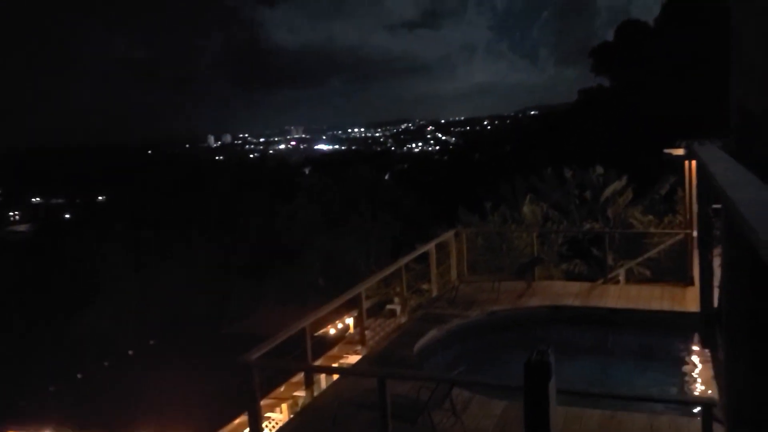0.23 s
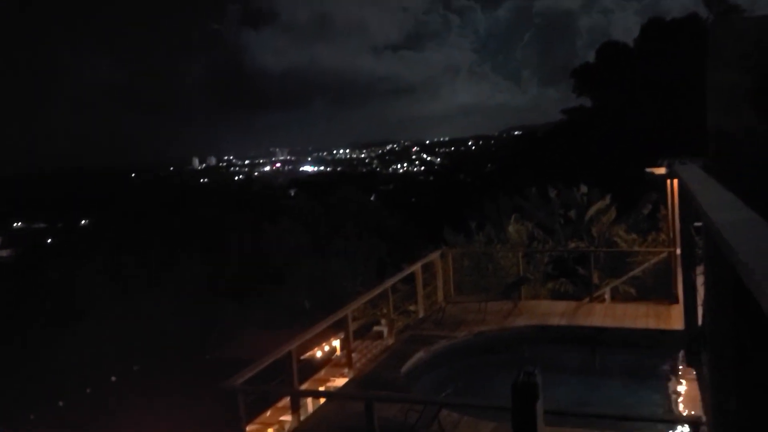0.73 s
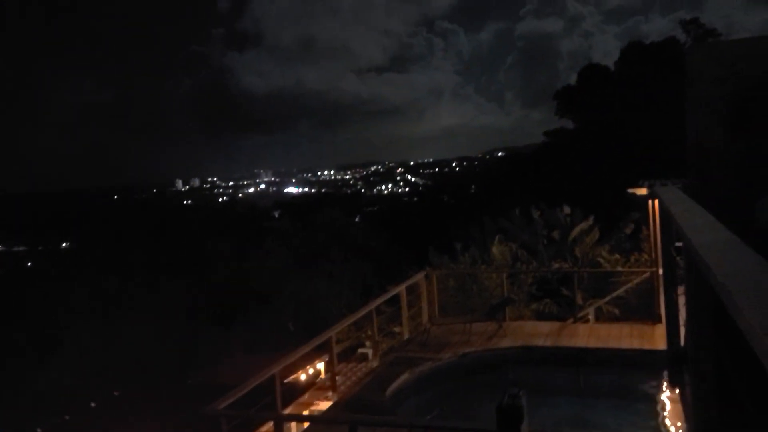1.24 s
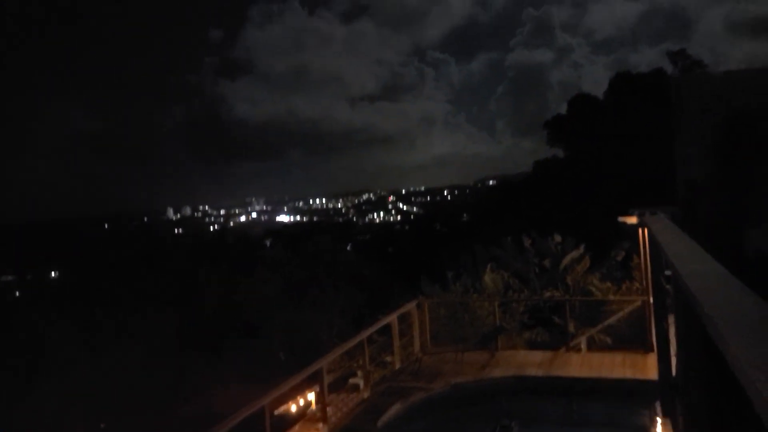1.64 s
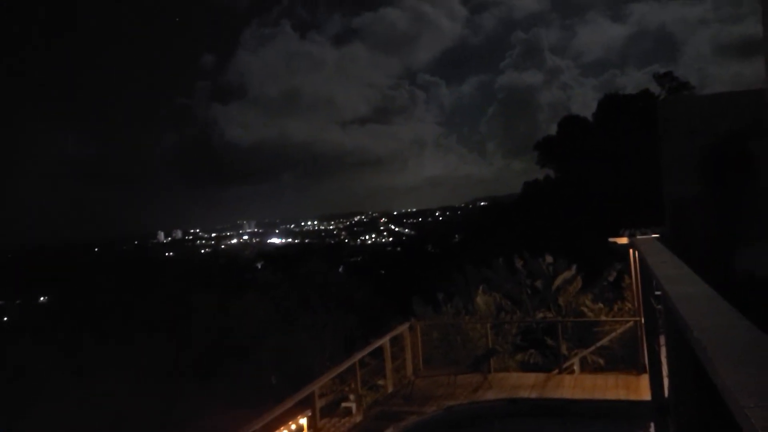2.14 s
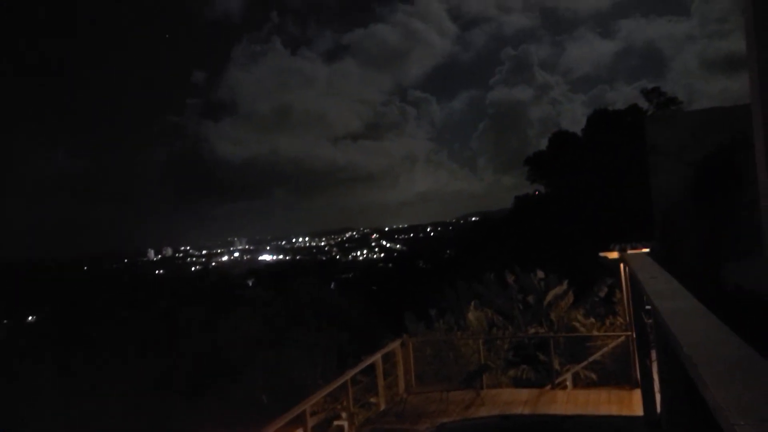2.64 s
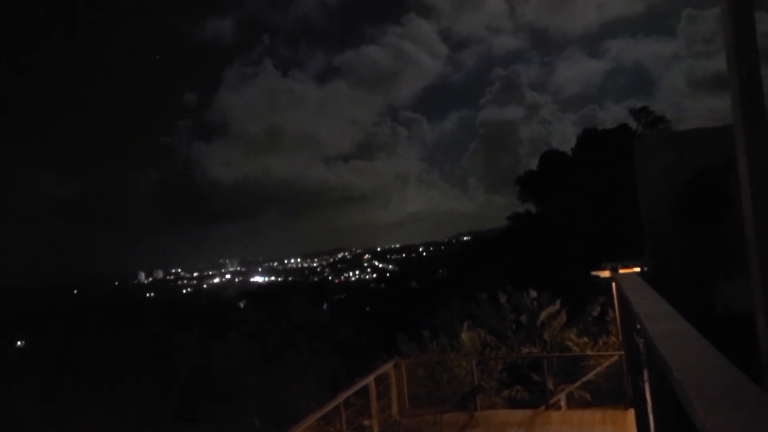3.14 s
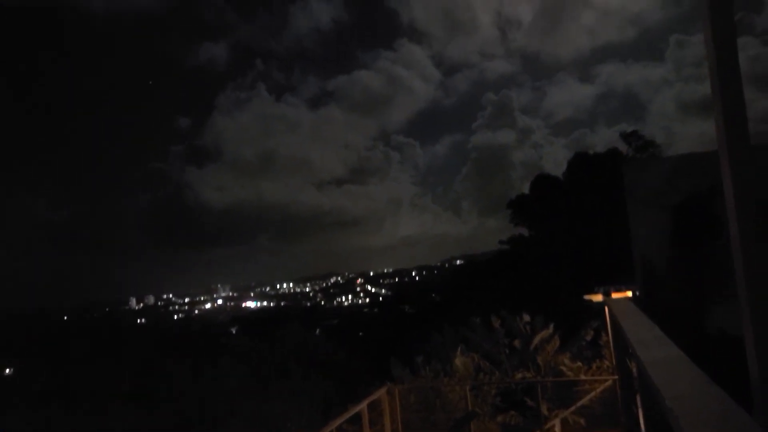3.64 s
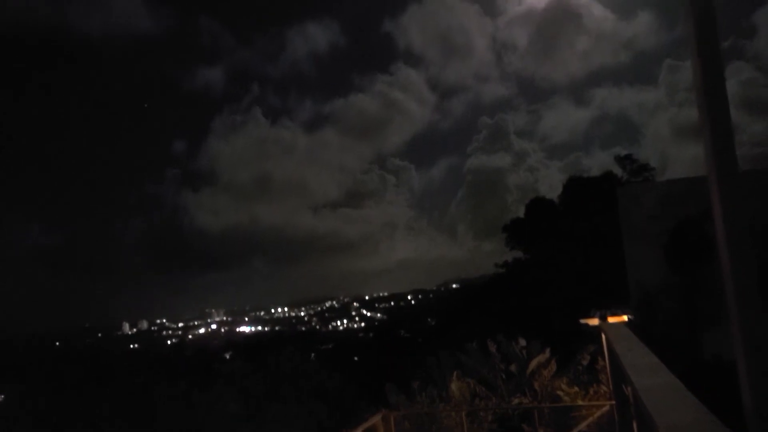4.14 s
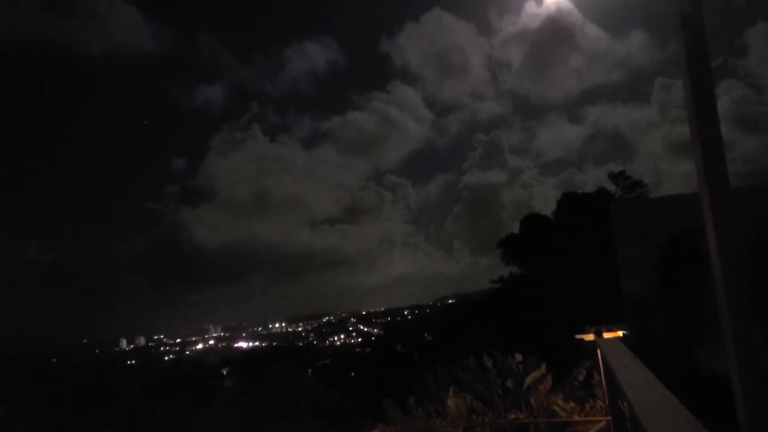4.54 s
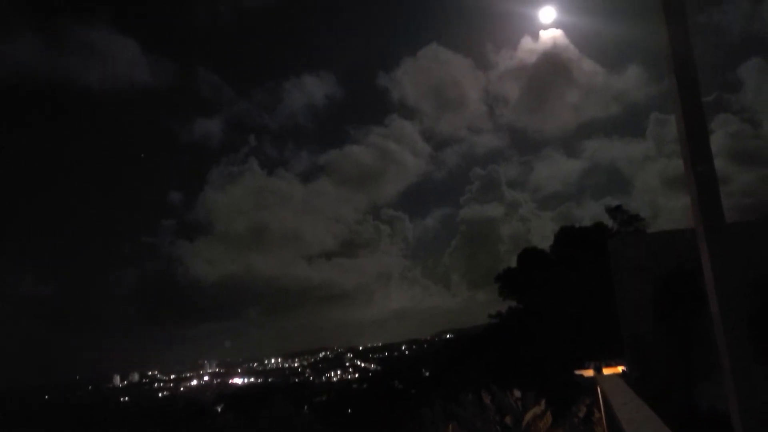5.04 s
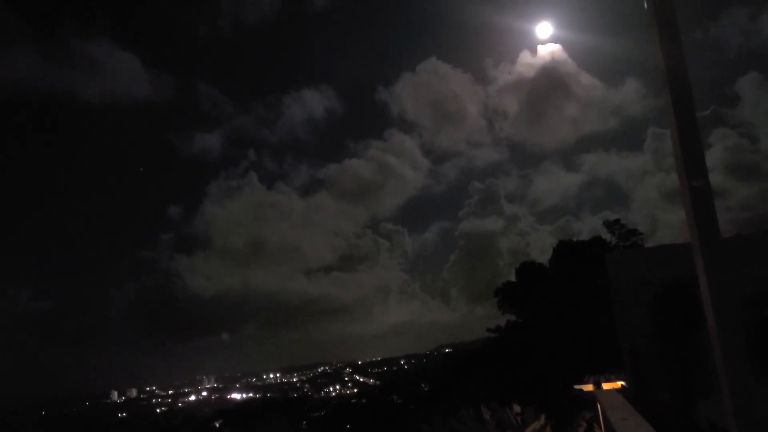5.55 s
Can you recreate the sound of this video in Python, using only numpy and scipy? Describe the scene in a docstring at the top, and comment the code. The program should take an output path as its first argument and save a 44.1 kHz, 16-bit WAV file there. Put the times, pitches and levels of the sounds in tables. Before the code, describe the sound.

Tree frogs whistle two-note calls over a shrill, steady insect chorus on a warm night terrace, with early wind thumps and a late distant engine.

```python
"""A warm night on a hillside terrace, heard through two microphone ports: far frogs call (echoes of gliding tones),
crickets and katydids shrill (coloured noise, pulsing in level), and the town below rumbles and hisses (noise).
Wind buffets both ports, mostly in the first two seconds (low noise shaped by gusts). From the start, tree frogs
whistle a falling low note and a rising high one, one frog near at 1.2, 3.1 and 5.1 s; high ticks and pips join in.
The low rumble sinks from 1 to 2.2 s, as if a wind filter cut the lows. After 3.2 s a far vehicle fades in
and speeds up, easing at the very end (sines at multiples of its firing rate)."""
import sys
import numpy as np
from scipy import signal
from scipy.fft import rfft, irfft, next_fast_len
from scipy.io import wavfile
from scipy.ndimage import uniform_filter1d, map_coordinates

SR = 44100
rng = np.random.default_rng(int(sys.argv[2]) if len(sys.argv) > 2 else 0)


def amplitude_ratio(level_db):
    """Convert a level in decibels to the matching linear amplitude (field) ratio."""
    exponent = np.asarray(level_db, float) / 20
    return 10 ** exponent


def to_wav(s):
    """Save 16-bit WAV."""
    ch = np.atleast_2d(s).T  # columns
    pcm = np.round(np.clip(ch, -1, 1) * 32767)  # PCM
    wavfile.write(sys.argv[1], SR, pcm.astype(np.int16))


N = 254898  # samples, 5.78 s

# shapes of the notes: length_s, glide (share of the starting pitch), rise_s, fade_db (change over the note)
LOW = (.092, -.062, .004, -5)
HIGH = (.118, .21, .015, -3)
PIP = (.026, -.04, .006, 0)
TICK = (.016, .015, .004, 0)
# far frogs by kind: shape, rate (notes a second), mean_start_pitch_hz, pitch_spread_hz, level_db
FAR_FROGS = [(HIGH, 45, 2670, 60, -42.5), (PIP, 80, 2000, 90, -46), (LOW, 5.5, 1680, 49, -57.5),
             (HIGH, 9, 2760, 60, -49)]
# colour of the crickets' trill: frequency_hz, density_db (per Hz)
CRICKET_COLOUR = [(3650, -120), (3900, -25.5), (4400, -29), (5000, -19), (5500, -22), (5850, -6),
                  (6100, 1.5), (6320, -7.5), (6480, -3), (6700, -14.5), (6950, -12), (7500, -26.5),
                  (7900, -19), (8250, -28.5), (8400, -120)]
# colour of the katydids' rasp: frequency_hz, density_db (per Hz)
KATYDID_COLOUR = [(7900, -120), (8200, -24), (8900, -18), (9500, -15), (10800, -2), (11600, 2.5),
                  (12050, 7), (12500, 3.5), (13000, 7), (13500, 3), (15700, 4), (15800, -120)]
# strength of the breeze at the ports: time_s, level_db
BREEZE_LEVEL = [(0.0, -42), (0.4, -42), (0.8, -40), (1.1, -38), (1.54, -40), (2.05, -40), (2.25, -52),
                (2.55, -43), (2.85, -47.5), (3.1, -50.5), (4.1, -49), (4.4, -39), (4.6, -60), (5.78, -44)]
# strong single buffets: peak_s, left_db, right_db, width_s (between points 8 dB down)
GUSTS = [(0.045, -28.5, -46, 0.016), (0.083, -23, -47, 0.016), (0.177, -21, -20.5, 0.056),
         (0.259, -51, -30.5, 0.041), (0.539, -50, -27, 0.013), (0.583, -28, -49, 0.012),
         (0.731, -33, -23.5, 0.093), (0.795, -26.5, -22, 0.039), (0.899, -24, -21.5, 0.086),
         (1.162, -37, -25, 0.012), (1.267, -40, -32.9, 0.026), (1.455, -26, -25, 0.014),
         (1.498, -29, -24, 0.037), (1.593, -27, -27, 0.071), (1.652, -26, -24.5, 0.015),
         (1.785, -35, -32, 0.035), (1.937, -37, -33, 0.027), (1.986, -26.5, -34, 0.055),
         (2.93, -33, -34, 0.036)]
# colour of the wind at a port: frequency_hz, density_db (per Hz)
WIND_COLOUR = [(13, -34), (22, -19), (53, 1), (81, 4.5), (155, -20.5), (210, -19.5), (265, -35), (400, -33),
               (520, -44), (880, -120)]
# colour of the town's rumble: frequency_hz, density_db (per Hz)
TOWN_COLOUR = [(20, -120), (25, -7), (60, 3), (100, 2.5), (170, -7), (260, -6), (430, -12.5), (620, -15.5),
               (850, -16.5), (1200, -120)]
# level at which the low rumble is kept: it sinks from 1 to 2.2 s, as if a wind filter cut the lows:
# time_s, level_db
KEPT_RUMBLE_LEVEL = [(0, -43.5), (0.89, -44), (1.05, -48), (2.05, -50), (2.17, -56), (2.22, -43),
                     (5.78, -43.5)]
# colour of the soft hiss: frequency_hz, density_db (per Hz)
HISS_COLOUR = [(300, -120), (450, -9.5), (800, -2), (1300, -1.5), (1800, -3.5), (2500, 0.5), (3200, -35),
               (3450, -44), (3600, -120)]
# sound from all around: frequency_hz, left-right correlation (limited to -1..1 in use)
SURROUND_LIKENESS = [(60, 0.9), (99, 1), (160, 0.9), (270, 0.86), (450, 0.29), (740, 0.074), (1220, -0.45),
                     (2010, 0.3), (3330, -1.37), (5500, -0.76), (9080, 0.05), (15000, 0.02)]
# two-note calls: start_s, wait_s (until the high note), low_start_pitch_hz, high_start_pitch_hz,
# low_level_db, high_level_db
TWO_NOTE_CALLS = [(0.058, 0.23, 1690, 2800, -53, -39), (0.324, 0.21, 1707, 2720, -40.5, -38.5),
                  (0.53, 0.19, 1744, 2625, -47, -43.5), (0.95, 0.2, 1660, 2780, -53, -41),
                  (1.212, 0.23, 1542, 2333, -33, -30), (1.585, 0.3, 1656, 2716, -51, -43.5),
                  (1.756, 0.21, 1714, 2646, -49, -43), (2.042, 0.22, 1680, 2807, -68, -44),
                  (2.131, .217, 1665, 2820, -61, -46), (2.275, 0.12, 1727, 2790, -45.5, -40),
                  (2.598, 0.18, 1595, 2765, -46, -40), (2.87, 0.18, 1700, 2700, -53, -46),
                  (3.097, 0.28, 1720, 2730, -49, -38), (3.116, .237, 1511, 2332, -32, -32),
                  (3.188, 0.22, 1717, 2770, -40, -43), (3.53, 0.23, 1640, 2750, -59, -41.5),
                  (3.609, .215, 1700, 2824, -61, -43.5), (3.904, 0.24, 1666, 2750, -52, -48),
                  (4.195, 0.21, 1763, 2600, -49, -47), (4.43, 0.25, 1700, 2675, -67, -44),
                  (4.567, 0.14, 1760, 2763, -49, -38.5), (4.715, .238, 1595, 2640, -45.5, -47.5),
                  (4.97, 0.18, 1654, 2740, -55, -42.5), (5.101, .224, 1528, 2310, -32, -31),
                  (5.386, 0.19, 1710, 2700, -47, -43)]
# a row of high ticks: start_s, start_pitch_hz, level_db
TICK_ROW = [(0.068, 3500, -44), (0.199, 3490, -39.5), (0.318, 3550, -39), (0.431, 3500, -48)]
# the clearest short pips of a second kind of frog: start_s, start_pitch_hz, level_db
PIP_CALLS = [(0.344, 2045, -42.5), (0.506, 1984, -40), (0.578, 2080, -40.5), (0.688, 2120, -43),
             (1.566, 2110, -42.5), (1.865, 1825, -44), (2.093, 2136, -42), (2.268, 1960, -44),
             (2.345, 2153, -39.5), (2.782, 2116, -41), (3.265, 2180, -43.5), (3.946, 2040, -43),
             (4.135, 2156, -43), (4.281, 2134, -44), (4.57, 2040, -42), (4.731, 1990, -39.5),
             (5.059, 2195, -44.5), (5.477, 2168, -42.5)]
# the vehicle's engine: time_s, firing_rate_hz, level_db
ENGINE_RUN = [(3.3, 45.4, -48.5), (3.91, 53.3, -44.5), (4.1, 58.66, -47.5), (4.53, 66.95, -43),
              (5.1, 77.46, -42), (5.58, 85.5, -46), (5.78, 81.8, -48)]
# engine orders at once, twice and three times the firing rate: level_db
ENGINE_ORDERS = [0.4, -3.5, -4.5]
# resonances of the exhaust pipe that lift a passing order: frequency_hz, gain_db
PIPE_GAIN = [(45, -7), (58, -6), (68, -2), (90, 0.7), (125, -7.5), (152, 5.5), (172, -3.5), (200, -5.5),
             (225, -17)]


def unit(x):
    """Scaled to rms 1."""
    return x / np.sqrt(np.mean(x ** 2) + 1e-20)


def along(points, hz):
    """(Hz, value) points read on a log frequency axis."""
    f, value = np.transpose(points)
    return np.interp(np.log(hz + 1), np.log(f + 1), value)


def curves(rows):
    """One value per sample for each column after the time."""
    s, *columns = np.transpose(rows)
    return [np.interp(np.arange(N) / SR, s, column) for column in columns]


def wobble(rate):
    """A smooth random curve through `rate` random knots a second, 40 at most."""
    knots = rng.standard_normal(int(N * 40 / SR) + 4)
    return map_coordinates(knots, [np.arange(N) * min(rate, 40) / SR])


def left_right(pan_db):
    """Half of a left-over-right difference in dB, added on the left and taken off on the right."""
    return np.array([[pan_db / 2], [-pan_db / 2]])


def rush(colour, likeness):
    """Stereo noise of rms 1: the mix of mid and side sets how alike left and right are."""
    m = next_fast_len(N + 8192)
    hz = np.fft.rfftfreq(m, 1 / SR)
    turn = np.arccos(np.clip(along(likeness, hz), -1, 1)) / 2
    spectra = rfft(rng.standard_normal((2, m))) * amplitude_ratio(along(colour, hz))
    mid, side = irfft(spectra * [np.cos(turn), np.sin(turn)], m)[:, :N]
    return unit(np.array([mid + side, mid - side]))


def whistle(hz, shape):
    """One note per row: a pure tone whose pitch glides fast at first, then levels off."""
    length, glide, rise, fade_db = shape
    t = np.arange(SR // 6) / SR
    bend = 1 + glide * np.tanh(1.9 * t / length) / np.tanh(1.9)
    ramps = np.clip(np.minimum(t, length - t) / rise, 0, 1)
    swell = ramps * amplitude_ratio(fade_db * (t / length - .5))
    return np.sqrt(2) * swell * np.sin(2 * np.pi * np.outer(hz, np.cumsum(bend) / SR))


def foliage(count, t60, build):
    """Echo tails off leaves and slope, own noise per side, mean energy 1; a wall answers in a bunch at 45 ms."""
    t = np.arange(SR // 3) / SR
    leaves = amplitude_ratio(-60 * t / t60) * (1 - np.exp(-t / build))
    wall = .3 * np.exp(-((t - .045) / .012) ** 2)
    tails = rng.standard_normal((count, 2, len(t))) * (leaves + wall)
    return tails / np.sqrt(np.mean(np.sum(tails ** 2, axis=2)))


def chorus():
    """Far frogs call at random moments from ever new places; only their echoes arrive."""
    out = np.zeros((2, N))
    piece, pieces = SR // 10, 66  # samples; each piece of time has its own echoes
    lead_in = SR // 2  # samples cut off, so that the chorus is already under way
    for shape, rate, hz, spread_hz, db in FAR_FROGS:
        starts = (np.cumsum(rng.exponential(1, 1200)) / rate * SR).astype(int)
        starts = starts[starts < N + lead_in]
        pitch_draw, level_draw = rng.standard_normal((2, len(starts)))
        notes = whistle(hz + spread_hz * np.clip(pitch_draw, -2, 2), shape)
        notes = notes * amplitude_ratio(1.5 * level_draw[:, None])
        line = np.zeros(piece * pieces)
        for at, note in zip(starts, notes):
            line[at:at + len(note)] += note
        tails = foliage(count=pieces, t60=.55, build=.004)
        echoes = signal.fftconvolve(line.reshape(pieces, 1, piece), tails, axes=2)
        far = np.zeros((2, piece * pieces + SR))
        for k, echo in enumerate(echoes):
            far[:, k * piece:][:, :echo.shape[1]] += echo
        out += amplitude_ratio(db) * unit(far[:, lead_in:lead_in + N])
    return out * amplitude_ratio(left_right(1.2))


def crickets(swell):
    """Many crickets: noise in narrow wing resonances, its level trilling near 148 Hz, louder on the left."""
    t = np.arange(N) / SR
    trill_db = 0.55 * np.sin(2 * np.pi * 148 * t + 3 * wobble(8.3))
    drift_db = 0.1 * wobble(1.67) + .5 * swell + 0.093 * wobble(12)
    level_db = -37 + drift_db + trill_db + left_right(2)
    return amplitude_ratio(level_db) * rush(CRICKET_COLOUR, [(6000, 0.062)])


def katydids(swell):
    """Katydids rasp: wide-band noise in slow pulses near 25 and 12.4 a second, louder on the left."""
    t = np.arange(N) / SR
    rasp_db = .55 * np.sin(2 * np.pi * 25 * t + 2.5 * wobble(3))
    rasp_db += .5 * np.sin(2 * np.pi * 12.4 * t + 2.5 * wobble(3))
    drift_db = 0.19 * wobble(2.28) + 0.49 * swell
    level_db = -39 + drift_db + rasp_db + left_right(4.5)
    return amplitude_ratio(level_db) * rush(KATYDID_COLOUR, [(12000, 0.027)])


def wind():
    """Eddies thump each port on its own: a steady breeze with lumps, and single buffets."""
    t = np.arange(N) / SR
    lumps_db = 6.5 * np.array([wobble(21), wobble(13)])
    power = amplitude_ratio(curves(BREEZE_LEVEL)[0] + lumps_db) ** 2
    for s, left_db, right_db, width in GUSTS:
        power += amplitude_ratio([[left_db], [right_db]]) ** 2 * np.exp(-(2.7 * (t - s) / width) ** 2)
    eddies = rush(WIND_COLOUR, [(60, 0.12)])
    # evened out over 32 ms: the gusts set the size, the eddies the shape
    steady = eddies / np.sqrt(np.abs(uniform_filter1d(eddies ** 2, size=1400)) + 0.025)
    return np.sqrt(power) * steady


def town_rumble():
    """Traffic below: low noise from all around, a little louder on the right, at the level that is kept of it."""
    level_db = curves(KEPT_RUMBLE_LEVEL)[0] + 0.29 * wobble(4.96) + left_right(-1.4)
    return amplitude_ratio(level_db) * rush(TOWN_COLOUR, SURROUND_LIKENESS)


def soft_hiss():
    """A soft hiss from all around: mid-band noise with a slightly drifting level."""
    return amplitude_ratio(-49.5 + .6 * wobble(3.44)) * rush(HISS_COLOUR, SURROUND_LIKENESS)


def place_notes(s, hz, db, pan_db, shape, direct_db, echo_db, t60):
    """Single notes: the direct sound reaches the left port first, each note has its own echoes."""
    paths = amplitude_ratio(echo_db) * foliage(count=len(s), t60=t60, build=0.002)
    direct = amplitude_ratio(direct_db + .15 * (db - db.max()))  # the fainter, the farther and the more echo
    paths[:, 0, 0] += direct
    paths[:, 1, 18] += direct  # 18 samples later, 0.4 ms
    heard = signal.fftconvolve(whistle(hz, shape)[:, None], paths, axes=2)
    out = np.zeros((2, N + SR))
    for at, level_db, note in zip(s, db, heard):
        out[:, round(at * SR):][:, :note.shape[1]] += amplitude_ratio(level_db + left_right(pan_db)) * note
    return out[:, :N]


def two_note_frogs():
    """Tree frogs whistle a falling low note, then a rising high note with more echo to it."""
    s, wait, low_hz, high_hz, low_db, high_db = np.transpose(TWO_NOTE_CALLS)
    low = place_notes(s, low_hz, low_db, -3.8, LOW, direct_db=0.5, echo_db=-4.5, t60=0.24)
    high = place_notes(s + wait, high_hz, high_db, 4.5, HIGH, direct_db=-5.5, echo_db=-0.54, t60=0.34)
    return low + high


def high_ticks():
    """A row of very short high whistles, far louder on the right."""
    s, hz, db = np.transpose(TICK_ROW)
    return place_notes(s, hz, db, -12, TICK, direct_db=4.0, echo_db=-8, t60=0.15)


def pip_frogs():
    """A second kind of frog: short, slightly falling whistles with little echo."""
    s, hz, db = np.transpose(PIP_CALLS)
    return place_notes(s, hz, db, 0, PIP, direct_db=2.5, echo_db=-9.5, t60=0.08)


def vehicle():
    """One far engine: orders of the firing rate climb through the resonances of the exhaust pipe."""
    hz, level_db = curves(ENGINE_RUN)
    turn = 2 * np.pi * np.cumsum(hz * (1 + 0.0028 * wobble(12))) / SR
    engine = np.zeros(N)
    for order, order_db in enumerate(ENGINE_ORDERS, start=1):
        gain_db = level_db + order_db + along(PIPE_GAIN, order * hz) + 0.97 * wobble(5)
        engine += amplitude_ratio(gain_db) * np.sqrt(2) * np.sin(order * turn)
    fade_in = np.clip((np.arange(N) / SR - 3.2) / 0.49, 0, 1)
    return fade_in * engine * amplitude_ratio(left_right(-1.6))


def scene():
    """All sources at the two ports; crickets and katydids share one swell."""
    swell = wobble(13)
    night = chorus() + crickets(swell) + katydids(swell) + wind() + town_rumble() + soft_hiss()
    return night + two_note_frogs() + high_ticks() + pip_frogs() + vehicle()


def top_cut(x):
    """Nothing passes above the cut-off."""
    return signal.sosfilt(signal.butter(12, 15750, fs=SR, output="sos"), x)


def record(dry):
    """The finished mix of both ports, as it is kept."""
    return top_cut(dry)


dry = scene()
out = record(dry)
to_wav(out)
```